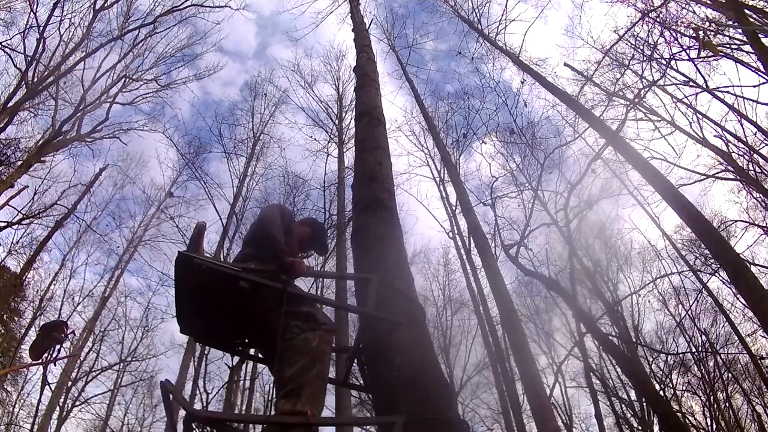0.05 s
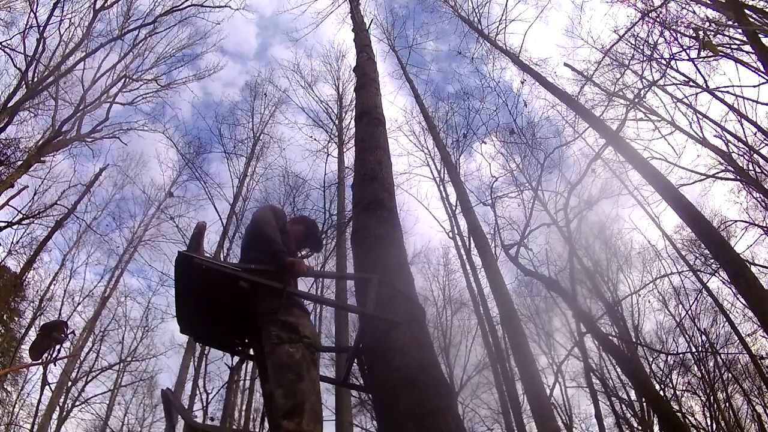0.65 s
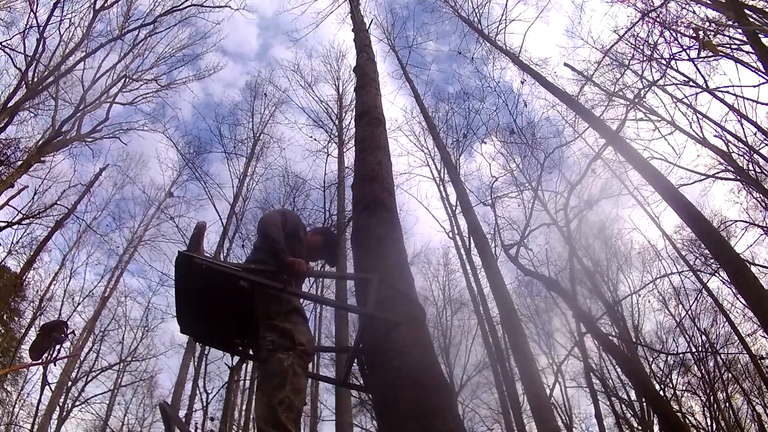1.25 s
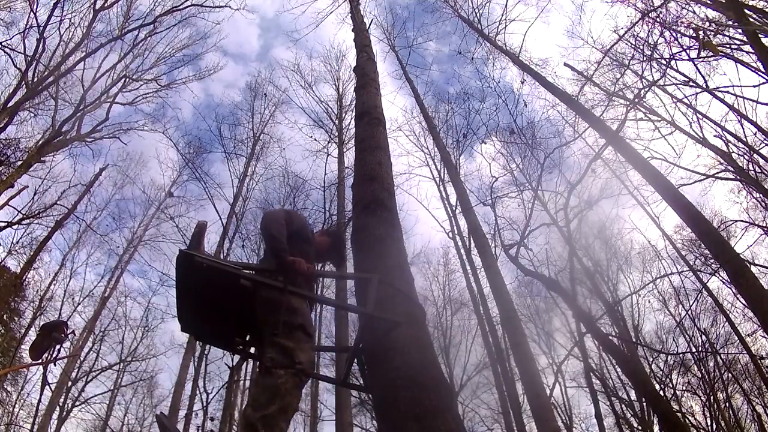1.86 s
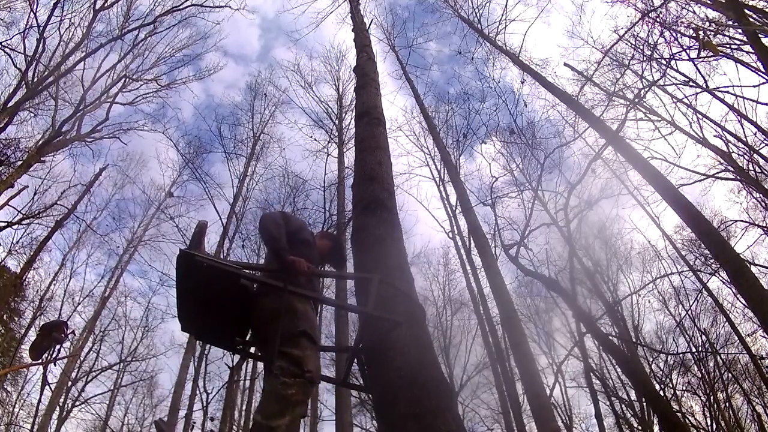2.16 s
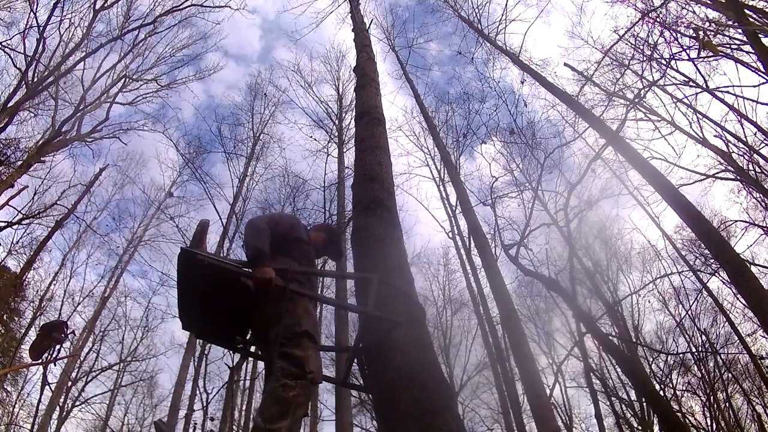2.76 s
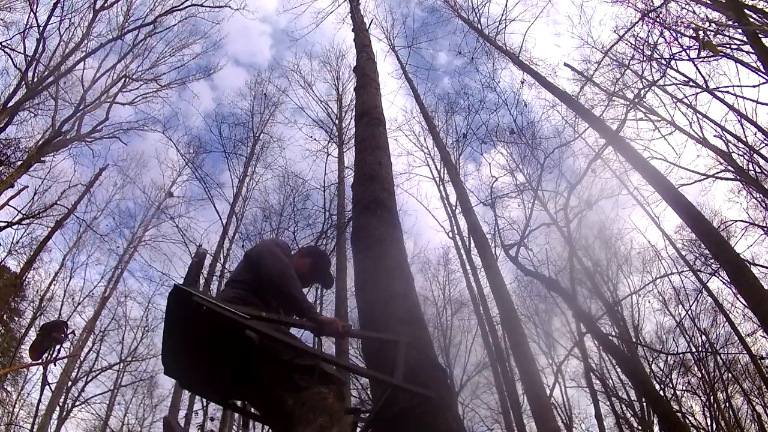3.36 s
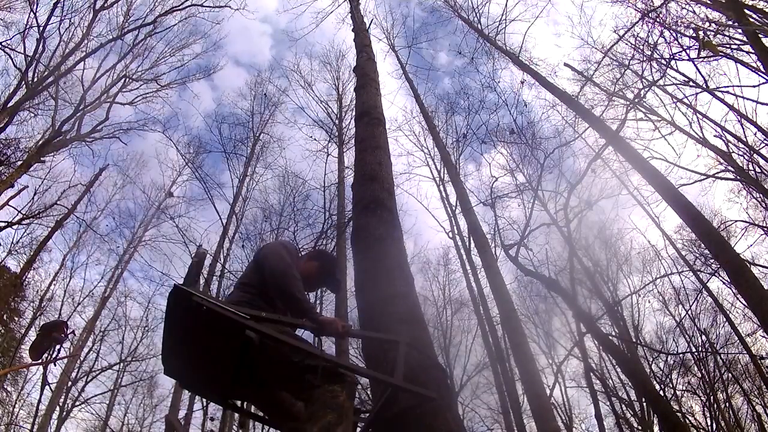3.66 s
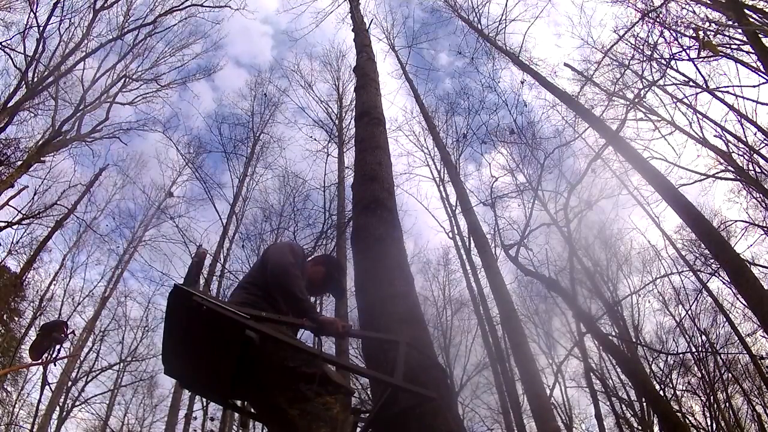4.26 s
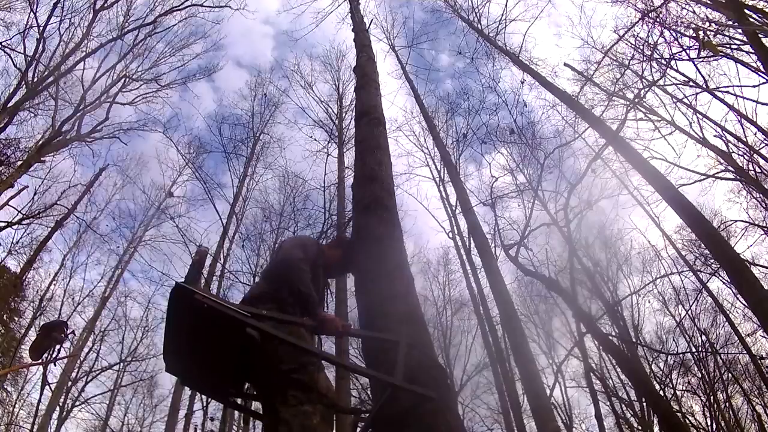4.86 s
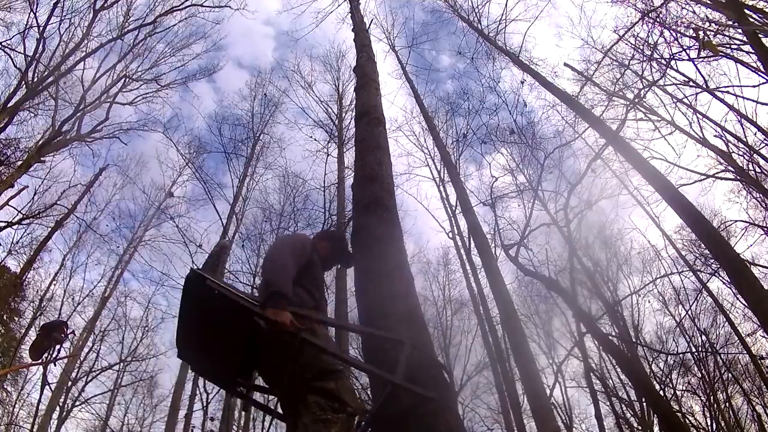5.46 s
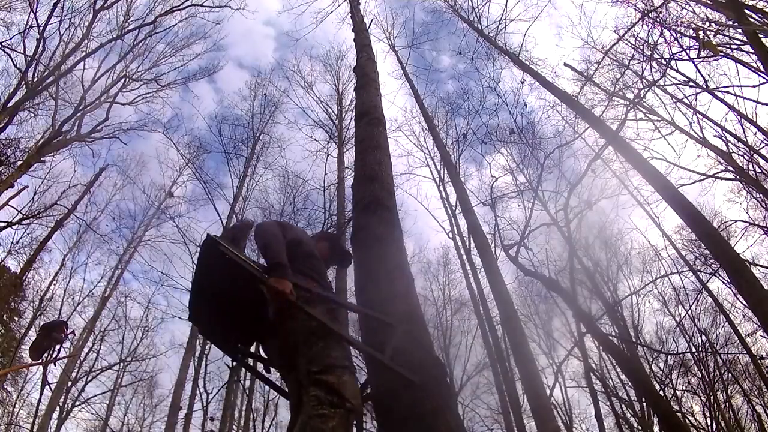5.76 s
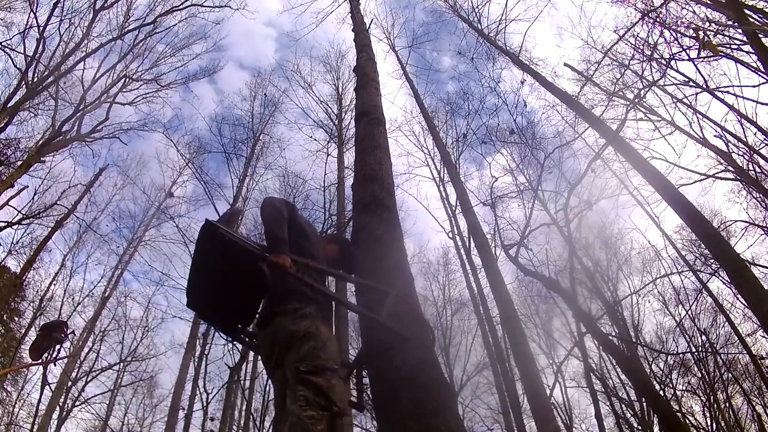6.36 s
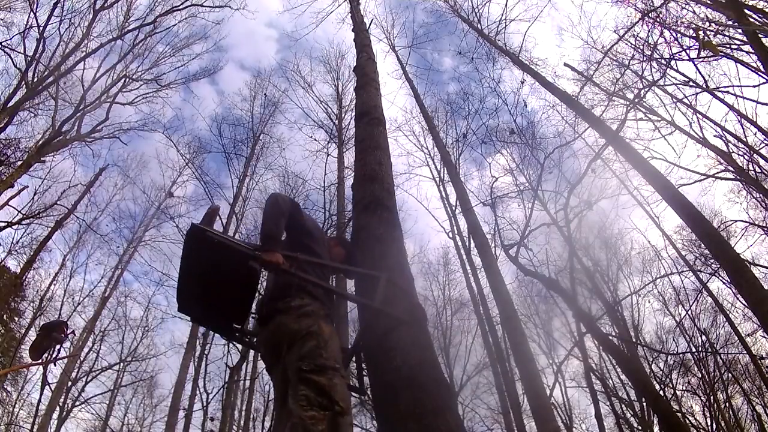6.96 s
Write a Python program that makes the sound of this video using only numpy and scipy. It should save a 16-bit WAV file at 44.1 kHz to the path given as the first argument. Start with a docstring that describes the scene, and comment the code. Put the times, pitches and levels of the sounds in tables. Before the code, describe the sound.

A metal ladder stand knocks, clinks and rattles as someone shifts on it, with clothing rustle over a faint distant engine hum.

```python
"""A metal ladder stand knocks and chatters as a man shifts about on it, a few metres overhead.
Impacts excite the damped modes of its tubes, rails and small buckles; clothes and a boot scuff it
by stick-slip friction. Bare winter trunks scatter a faint tail, and a distant engine hums under
the soft noise of the air. A thin high whine runs throughout, and the sound cuts out twice."""
import sys
import numpy as np
from scipy import signal
from scipy.fft import rfft, irfft, next_fast_len
from scipy.io import wavfile
from scipy.ndimage import uniform_filter1d

SR = 44100
rng = np.random.default_rng(int(sys.argv[2]) if len(sys.argv) > 2 else 0)


def to_wav(sig):
    """Store sig (one row per channel, or 1-D mono) as 16-bit WAV at the path in sys.argv[1].

    Samples outside -1..1 are clipped; the rate is SR.
    """
    pcm = np.clip(np.atleast_2d(sig), -1, 1) * 32767
    pcm = np.round(pcm).astype(np.int16)
    wavfile.write(sys.argv[1], SR, pcm.T)  # frames by channels


N = 318402
TIME = np.arange(N) / SR

# modes of the tube frame: frequency_hz, level_db, t60_s
FRAME_MODES = [(263.3, -9.5, 0.14), (410, -15.5, 0.18), (642, -2.5, 0.063), (930, -29, 0.062),
               (976, -14, 0.14), (1156, -4.5, 0.096), (1234, 1.5, 0.057), (1370, -22, 0.085),
               (1567, -3, 0.026), (1710, -1, 0.032), (1943, -0.5, 0.039), (2070, 3.5, 0.03),
               (2290, -14, 0.039), (2353, -7.5, 0.065), (3070, 2, 0.047), (3486, 6.5, 0.036),
               (3805, 5.5, 0.03), (4100, 4.5, 0.047), (4310, 5, 0.031), (4830, -39, .06),
               (6500, 8.5, 0.031), (6600, 2, 0.033), (8350, -10, 0.11)]
# the man's movements: start_s, length_s, effort_db, brightness_db (heavy boot < 0 < light cloth)
MOVEMENTS = [(0.091, 0.12, -51.5, 7), (.45, 0.13, -51.5, 4), (1.13, 0.075, -54.5, -4),
             (1.35, 0.034, -57, -7.5), (1.649, .22, -57, -2.5), (2.18, .07, -57.5, -3),
             (2.35, 0.091, -66.5, -11.5), (2.771, 0.064, -67, -7), (3.08, 0.059, -57.5, 1),
             (3.26, 0.039, -54.5, -8.5), (3.39, .16, -53, 3), (3.74, 0.096, -41, 6), (3.859, .1, -49.5, 13),
             (4.26, .07, -48.5, 11), (4.38, 0.018, -54.5, -4.5), (4.54, .14, -56, -1),
             (5.301, 0.17, -57, 1), (5.48, 0.031, -46, -4), (5.7, 0.064, -45.5, -2.5),
             (5.9, 0.066, -48.5, -4), (6.02, 0.052, -50, -5.5), (6.25, .07, -52, -5.5),
             (6.39, 0.018, -56.5, -13), (6.6, .1, -48.5, 3), (6.77, 0.056, -62.5, -8)]


def knock(strength_db, hardness_db, weight_db, decay_s, note_hz):
    """Impact excitation: an impulse, chatter in the loose joints, then free vibration of the tubes."""
    # thud, clank, clack, tick and fizz: low_hz, high_hz
    bands = [(90, 800), (850, 1450), (1500, 2450), (2750, 5100), (5300, 9400)]
    # clank, clack, tick and fizz: level_db at zero hardness, slope_db_per_db of hardness
    hardness_response = [(2.5, -0.4356), (-1, 0.47), (-17, 0.904), (-32.5, 1.04)]
    t = np.arange(SR // 4) / SR
    fade = np.exp(-t / decay_s) + amp(-28) * np.exp(-t / 0.02)
    blow = 2.8 * fade * rng.standard_normal(len(t))  # chatter
    blow[0] += 26  # contact impulse
    ring_db = -6 - 0.21 * (strength_db + 40)  # a strong blow stays pressed on and damps the tubes
    blow += amp(ring_db) * ring(FRAME_MODES, t, spread_db=2.5, detune=0.0036)
    # the struck part has a short note of its own
    blow += amp(-1) * np.exp(-t / (1.26 * decay_s)) * np.cos(2 * np.pi * note_hz * t)
    # weight feeds the thud; a harder contact shifts the rest towards the treble
    shares_db = [weight_db] + [db + slope * hardness_db for db, slope in hardness_response]
    out = np.zeros(len(t))
    for share_db, edges in zip(shares_db, bands):
        part = band(blow, edges)
        attack_rms = np.sqrt(np.mean(part[:round(0.008 * SR)] ** 2))
        out += amp(strength_db + share_db) * part / attack_rms
    return out


def knocks():
    """Superposition: the responses to separate blows on the frame add linearly."""
    # start_s, strength_db, hardness_db, weight_db, chatter_decay_s, note_hz
    blows = [(0.0674, -44.5, -7, -6, 0.016, 1710), (0.0782, -33.5, 5.5, -10, 0.017, 1753),
             (0.0845, -35.5, 10.5, -9, 0.0094, 1770), (.2633, -44, -2, -13, 0.011, 1790),
             (0.2856, -38.5, 0, -6, 0.01, 1720), (0.521, -36, -2, -10, 0.0076, 1228),
             (0.5306, -43, -5, -5, .008, 1225), (1.0309, -58, 26.5, 5, 0.016, 1534),
             (1.1224, -37.5, 5.5, -14, 0.014, 1230), (1.2997, -51, 12, 4, 0.015, 2350),
             (1.3215, -38, -1.5, -8.5, 0.012, 1238), (1.8394, -47, -6, 4, 0.0063, 1330),
             (1.8688, -46, -3, 1, 0.0041, 1360), (2.2344, -37.5, 9, -20, 0.0077, 1264),
             (2.2413, -42, 1, -11, 0.0094, 1220), (2.5819, -50, 7.5, -5, .011, 2126),
             (2.5904, -43.5, 5, -25, 0.006, 1330), (2.9599, -55.5, -2, 2, .007, 1330),
             (3.08, -51, -5, -8, .005, 1390), (3.094, -49.5, -3, 2, 0.012, 1140),
             (3.1325, -48.5, -3, -4, .007, 1220), (3.2308, -41.5, -1, -3, 0.006, 1300),
             (3.2528, -42, 1, -3, 0.0063, 1530), (3.297, -50.5, -3, -14, .005, 1520),
             (3.3086, -48, -0.5, -1.5, 0.0033, 1470), (3.7221, -41, -1, -5, 0.01, 1690),
             (3.7351, -45, -1, -1, .005, 1240), (3.7857, -31, -0.5, -8.5, 0.01, 1250),
             (3.7949, -37, 1, -19, .007, 2010), (3.8008, -36, 12, -27, 0.017, 1917),
             (3.8076, -35.5, 15.5, -15, 0.0085, 3100), (3.923, -50.5, 9, -19, 0.0092, 1530),
             (3.9894, -46, 12, -17, 0.0089, 1925), (4.2305, -46.5, 11.5, -7, .007, 2190),
             (4.3316, -51.5, -1, 4, 0.0084, 1045), (4.6731, -54.5, -3, -2, 0.0092, 1570),
             (4.7585, -59.5, 17.5, -6, 0.0071, 2190), (4.8317, -55, -3, 0, 0.0079, 1500),
             (4.876, -57.5, 12, -14, 0.0078, 1420), (5.0113, -41, 13, -6, 0.013, 2160),
             (5.0308, -38, 0.5, -10, 0.01, 1080), (5.1032, -54, -3, -13, .0053, 1200),
             (5.162, -50, -4, -1, 0.0093, 1173), (5.276, -50.5, -3, -0.5, 0.0049, 1270),
             (5.4724, -51, -15, 11.5, 0.023, 1200), (5.5656, -36.5, -8.5, -9, .012, 1327),
             (5.5812, -32, -8.5, -8, 0.0072, 1290), (5.6325, -40, 3.5, 1.5, 0.012, 945),
             (5.6573, -42, 1.5, -2, .005, 1290), (5.7251, -37.5, -3.5, -3, 0.0061, 1060),
             (5.737, -41, -4, -1, 0.0061, 1010), (5.7567, -36.5, -1.5, -3, 0.0087, 1004),
             (5.7744, -49, 1, 1, .006, 970), (5.7914, -48.5, -2, 2, 0.0057, 1000),
             (5.8108, -40.5, -6, -1, 0.0058, 1245), (5.8623, -51.5, -2, -12, .0055, 966),
             (5.8904, -46, -5, 0.5, 0.018, 1257), (5.9548, -37.5, -2.5, -10, 0.0063, 1155),
             (5.9798, -45.5, -13, -5, .005, 980), (6.0193, -57, 14, -6, .008, 1200),
             (6.0728, -50.5, -2, -5, 0.0048, 1160), (6.2292, -44.5, -12, -9, 0.0077, 1047),
             (6.2413, -39.5, -0.5, -3.5, .009, 1152), (6.2739, -43, 4, 0, .007, 1170),
             (6.334, -25, 5.5, -12, 0.0046, 1673), (6.3868, -31, -12.5, 0, 0.0057, 1296),
             (6.3925, -34.5, 5, 2.5, 0.0047, 1356), (6.4116, -49, -13, 12, .0057, 954),
             (6.578, -40.5, -7, -0.5, 0.005, 1160), (6.6297, -42.5, 5.5, -14, 0.0048, 1330),
             (6.6383, -39.5, -0.5, -5, 0.0081, 1290), (6.6737, -44, 1, 4.5, 0.0057, 1510),
             (6.6864, -46, -12, 2, 0.015, 1153), (6.805, -39, 4, -28, 0.0031, 2060)]
    out = np.zeros(N)
    for start, *blow in blows:
        add(out, start, knock(*blow))
    return out


def rattles(rate_hz=9, spread_db=7.5):
    """Play in the joints: they collide at random while he moves, harder the more he pushes."""
    out = np.zeros(N)
    for start, length, effort_db, brightness_db in MOVEMENTS:
        for place, chance, size, pitch in rng.uniform(size=(2, 4)):  # at most two per movement
            if chance < rate_hz * length / 2:
                strength_db = effort_db - 6 + spread_db * (2 * size - 1)
                note_hz = 1250 * 2 ** ((pitch - 0.5) / 2)
                hit = knock(strength_db, brightness_db - 2, weight_db=-4, decay_s=0.01, note_hz=note_hz)
                add(out, start + place * length, hit)
    return out


def frame_radiation(x, floor_db=-12):
    """Radiation efficiency: the frame gives off little sound between its groups of modes."""
    notched = x
    for hz, width_hz in ((2680, 240), (5400, 250)):
        notched = signal.lfilter(*signal.iirnotch(hz, hz / width_hz, fs=SR), notched)
    return notched + amp(floor_db) * (x - notched)


def shudders(rise_s=0.004, gain_db=-4):
    """Resonant build-up: heavy loads swing the long rails, which take a few ms to get going."""
    # shifts of weight: start_s, level_db
    loads = [(5.892, -49), (5.956, -49), (6.018, -38.5), (6.242, -42), (6.275, -30.5), (6.334, -32.5),
             (6.387, -38), (6.605, -41), (6.673, -45.5)]
    # slow modes of the whole ladder: frequency_hz, level_db, t60_s
    ladder_modes = [(75.6, -5, 0.18), (117, -8, 0.14), (243, -15, .2), (376, -0.5, 0.098), (422, -7, 0.17),
                    (607, -21, 0.084), (975, -2.5, 0.07), (1127, 1.5, 0.19), (1330, -10.5, 0.097)]
    out, t = np.zeros(N), np.arange(SR // 3) / SR
    for start, db in loads:
        swing = ring(ladder_modes, t, spread_db=3, detune=0.0045)
        add(out, start, amp(db + gain_db) * (1 - np.exp(-t / rise_s)) * swing)
    return out


def clinks(snap_s=0.0021):
    """Free vibration of a small body: a buckle snaps against metal and rings high and briefly."""
    # start_s, level_db
    contacts = [(.405, -50), (.446, -50.5), (.495, -53), (.56, -50.5), (0.93, -36), (.941, -49),
                (1.471, -45), (1.508, -58), (2.27, -52), (3.807, -31.5), (3.924, -44), (3.989, -37),
                (5.737, -41), (6.03, -52), (6.929, -60)]
    # frequency_hz, level_db, t60_s
    buckle_modes = [(1450, 0.5, 0.022), (1940, -8, 0.022), (3306, 3.5, 0.026), (3660, -17, 0.0083),
                    (3890, -1.5, .02)]
    out, t = np.zeros(N), np.arange(SR // 20) / SR
    for start, db in contacts:
        click = 0.65 * band(rng.standard_normal(len(t)) * np.exp(-t / snap_s), (2800, 4800))
        ping = ring(buckle_modes, t, spread_db=2.5, detune=0.02) * (1 - t / t[-1])
        add(out, start, amp(db) * (ping + click))
    return band(out, (1200, 4700))


def tap(start_s=1.1983, gain_db=-15, pitch_hz=680, decay_s=0.00063):
    """Heavy damping: one hollow, dead tap dies within two or three cycles."""
    out, t = np.zeros(N), np.arange(SR // 20) / SR
    envelope = t / decay_s * np.exp(-t / decay_s)
    add(out, start_s, -amp(gain_db) * envelope * np.sin(2 * np.pi * pitch_hz * t))
    return out


def rubbing():
    """Forced vibration: cloth and straps catch and slide, and their slips set the frame singing."""
    # spectrum of the rubbed frame: frequency_hz, level_db
    spectrum = [(100, -6), (250, 3.5), (500, 3.5), (800, -2.5), (1200, 1), (1600, -1.5), (2200, -8),
                (2800, -4), (3600, -14), (4400, -6.5), (5300, -53), (9000, -29)]
    # scuff, rasp and swish: gain_db, brightness_tilt, (low_hz, high_hz)
    layers = [(-4, -1.25, (170, 766)), (-1, 0, (900, 2280)), (-18, 0.56, (2650, 4900))]
    drive = slips(rate_hz=600, spread_db=4, hiss=0.35) * amp(2.5 * drift(90))
    frame_response = ring(FRAME_MODES, np.arange(SR // 4) / SR)
    singing = unit(signal.fftconvolve(drive, frame_response)[:N])
    friction = colour(drive, spectrum) + amp(-7) * singing
    return sum(amp(db) * effort(tilt) * unit(band(friction, edges)) for db, tilt, edges in layers)


def effort(tilt, attack_s=0.024, release_s=0.028, fidget_db=-65.5):
    """Incoherent addition: movements sum in power to a rubbing envelope; tilt weights brightness."""
    power = amp(fidget_db) ** 2  # he is never quite still
    for start, length, effort_db, brightness_db in MOVEMENTS:
        before = np.maximum(start - TIME, 0) / attack_s
        after = np.maximum(TIME - start - length, 0) / release_s
        envelope = np.exp(-np.minimum(before + after, 20))
        power = power + (amp(effort_db + tilt * brightness_db) * envelope) ** 2
    return np.sqrt(power)


def scrape():
    """Sliding friction: a boot sole drags grittily over the platform."""
    # time_s, level_db
    drag = [(1.6, -71), (1.66, -47.5), (1.68, -55), (1.72, -45), (1.76, -43), (1.8, -41.5), (1.845, -44.5),
            (1.865, -61), (1.9, -63)]
    # frequency_hz, level_db
    spectrum = [(71, -38), (120, -10), (160, -1), (234, -8.5), (474, 3), (731, -5.5), (993, -4.5),
                (1130, -3.5), (2240, -12), (2680, -33), (4210, -22.5), (5140, -39), (9000, -43),
                (11700, -73), (19800, -120)]
    envelope = amp(np.interp(TIME, *np.transpose(drag), left=-np.inf, right=-np.inf))
    return envelope * colour(slips(rate_hz=900, spread_db=3.5, hiss=0.63), spectrum)


def slips(rate_hz, spread_db, hiss):
    """Stick-slip friction: tiny releases of uneven size over a smooth hiss."""
    size = amp(spread_db * np.minimum(rng.exponential(1, N), 4))
    grains = size * rng.choice([-1, 1], N) * (rng.random(N) < rate_hz / SR)
    return unit(grains) + hiss * rng.standard_normal(N)


def woods(x, wet_db=-27, t60_s=0.84, rise_s=0.0026, echo_rate_hz=1500):
    """Scattering: many weak echoes from the trunks add a faint, dull tail."""
    t = np.arange(SR) / SR
    echoes = rng.standard_normal(SR) * (rng.random(SR) < echo_rate_hz / SR)
    envelope = np.exp(-np.log(1000) * t / t60_s) * (1 - np.exp(-t / rise_s))
    tail = band(echoes * envelope, (250, 4500))
    return x + amp(wet_db) * signal.fftconvolve(x, tail / np.linalg.norm(tail))[:N]


def engine(gain_db=-1.5, waver_db=0.5, wander_cycles=0.059):
    """Attenuation with distance: only the lowest firing orders carry, wavering in the air."""
    # time_s, firing_hz, level_db, upper_orders_db (relative to the first order)
    running = [(0, 64.4, -51, -18), (.9, 64, -50, -14), (1.7, 65.66, -54.5, -7), (2.5, 65.56, -52, -14),
               (3.1, 66.3, -49, -6), (3.7, 65.7, -54, -15), (5.3, 65.63, -56.5, -10.5),
               (6.8, 65, -54.5, -9), (7.22, 63.4, -65, -18)]
    times, *columns = np.transpose(running)
    firing_hz, db, upper_db = (np.interp(TIME, times, column) for column in columns)
    cycles = np.cumsum(firing_hz) / SR + wander_cycles * drift(8.2)
    orders = sum(amp(order_db + waver_db * drift(6)) * np.sin(2 * np.pi * order * cycles)
                 for order, order_db in enumerate((0, upper_db, upper_db - 3), 1))
    return np.sqrt(2) * amp(db + gain_db) * orders


def air(level_db=-52, swell_db=1.5, crossover_hz=500):
    """Broadband ambient noise: the low rumble swells with the breeze while the hiss stays steady."""
    # frequency_hz, level_db
    spectrum = [(12, -70), (20, -9), (48, -4.5), (72, -3.5), (149, -8), (240, -15), (292, -15),
                (754, -20.5), (1250, -22), (2180, -30), (2650, -33.5), (5950, -40.5), (12300, -44),
                (13700, -41), (15800, -48)]
    wash = colour(rng.standard_normal(N), spectrum)
    rumble = signal.sosfiltfilt(signal.butter(2, crossover_hz, fs=SR, output="sos"), wash)
    hiss = wash - rumble
    return amp(level_db) * (hiss + amp(swell_db * drift(3.82)) * rumble)


def whine():
    """Tonal noise: steady, closely spaced sinusoids merge into a thin electronic whine."""
    # frequency_hz, level_db
    tones = [(13114, -102), (13200, -112), (13281, -84.5), (13361, -90), (13447, -93)]
    return sum(np.sqrt(2) * amp(db) * np.sin(2 * np.pi * (hz * TIME + rng.random())) for hz, db in tones)


def ring(modes, t, spread_db=0, detune=0):
    """Modal decay: damped sinusoids, weighted and loaded a little differently at each striking point."""
    hz, db, t60 = np.transpose(modes)[:, :, None]
    weight, shift, sign = rng.standard_normal((3, len(modes), 1))
    gain = np.sign(sign) * amp(db + spread_db * weight)
    decay = np.exp(-np.log(1000) * t / t60)
    return (gain * decay * np.sin(2 * np.pi * hz * (1 + detune * shift) * t)).sum(0)


def colour(x, points):
    """Spectral shaping by (frequency_hz, level_db) points, scaled to rms 1."""
    hz, db = np.transpose(points)
    size = next_fast_len(len(x))
    gain = amp(np.interp(np.log(np.fft.rfftfreq(size, 1 / SR) + 1), np.log(hz), db))
    return unit(irfft(rfft(x, size) * gain, size)[:len(x)])


def band(x, edges_hz):
    """Steep causal band-pass filtering."""
    return signal.sosfilt(signal.butter(4, edges_hz, "band", fs=SR, output="sos"), x)


def drift(rate_hz):
    """Random modulation: glides between rate_hz chance values a second."""
    return np.interp(TIME * rate_hz, np.arange(N), rng.standard_normal(N))


def amp(db):
    """Decibels to amplitude ratio."""
    return 10 ** (np.asarray(db) / 20)


def unit(x):
    """Normalisation to rms 1."""
    return x / np.sqrt(np.mean(x ** 2) + 1e-20)


def add(mix, start_s, sound):
    """Superposes a sound on the mix from start_s."""
    part = mix[max(round(start_s * SR), 0):][:len(sound)]
    part += sound[:len(part)]


def scene():
    """Superposition in one channel: the stand and its echoes, the rubbing and the background."""
    continuous = rubbing() + engine() + whine() + air()
    stand = shudders() + clinks() + tap() + scrape() + frame_radiation(knocks() + rattles())
    return (woods(stand) + continuous)[None]


def record(dry, cutoff_hz=15900):
    """Gating and band limiting: the sound cuts out twice, and the highest treble is removed."""
    # start_s, end_s
    silences = [(3.314, 3.381), (6.951, 7.018)]
    gate = np.ones(N)
    for start, end in silences:
        gate[(TIME > start) & (TIME < end)] = 0
    gated = dry * uniform_filter1d(gate, size=40)
    low_pass = signal.firwin(511, cutoff_hz, window=("kaiser", 9), fs=SR)
    return signal.oaconvolve(gated, low_pass[None], "same")


dry = scene()
out = record(dry)
to_wav(out)
```